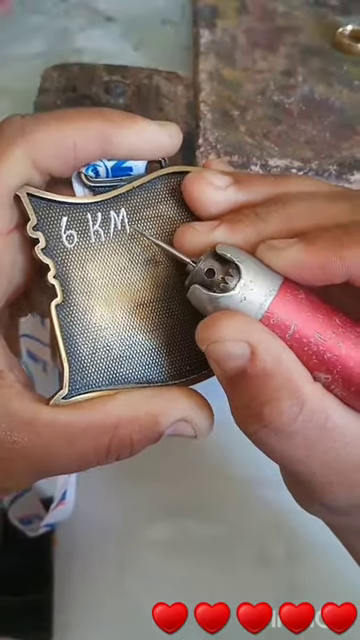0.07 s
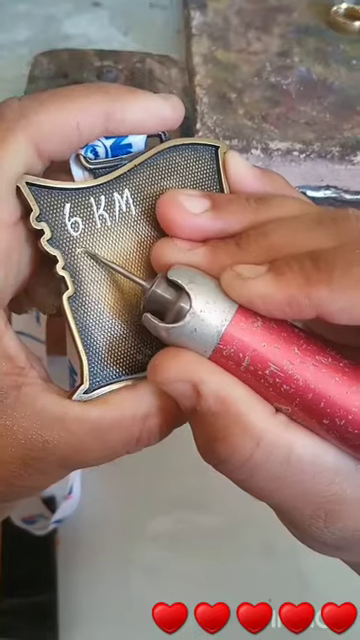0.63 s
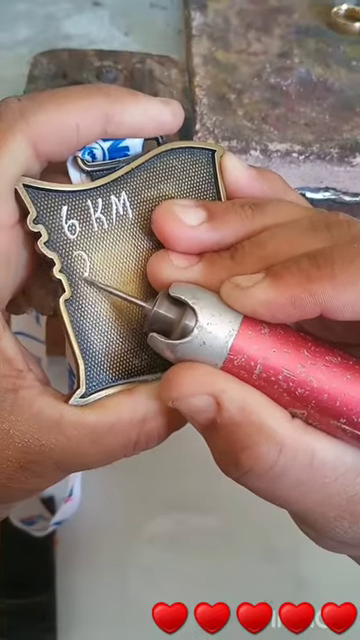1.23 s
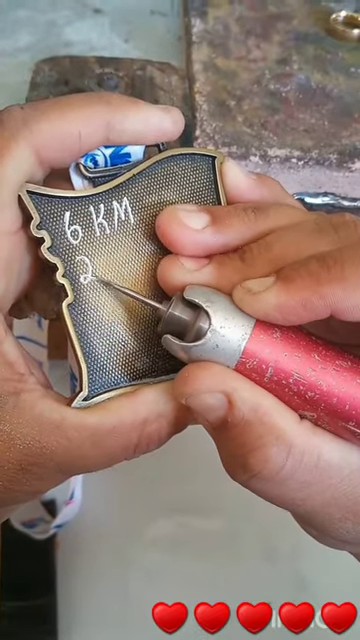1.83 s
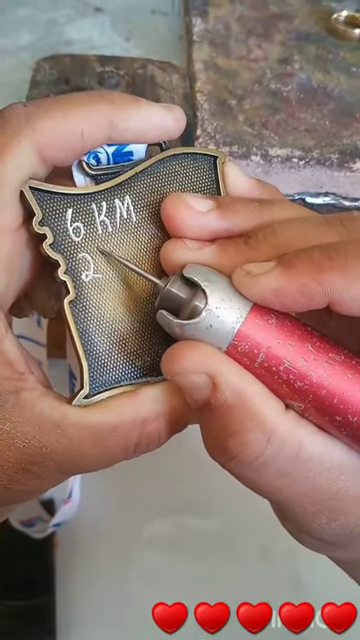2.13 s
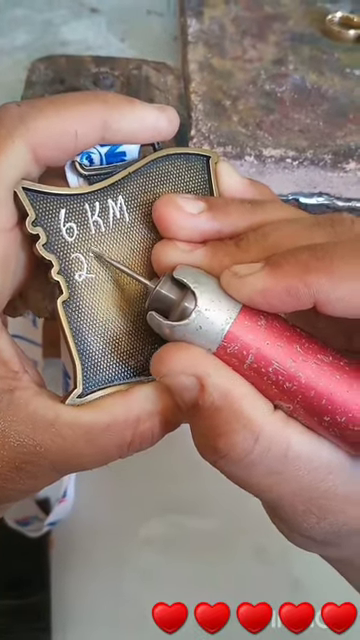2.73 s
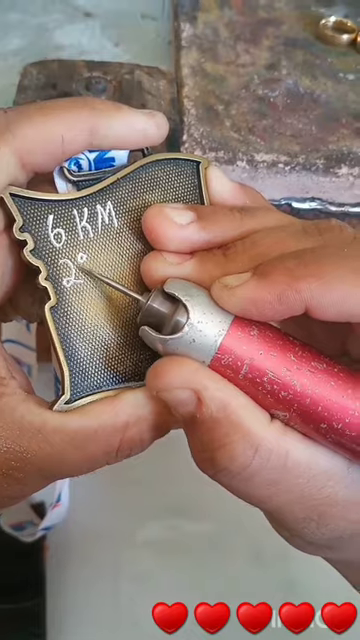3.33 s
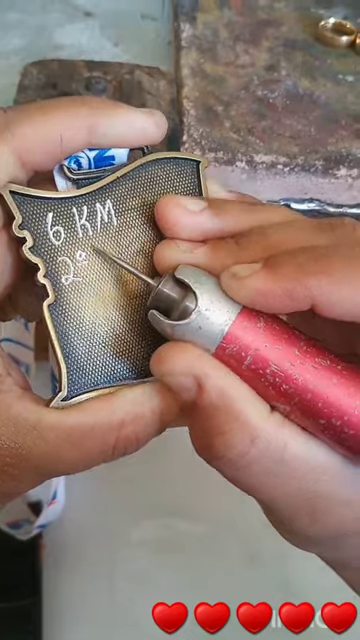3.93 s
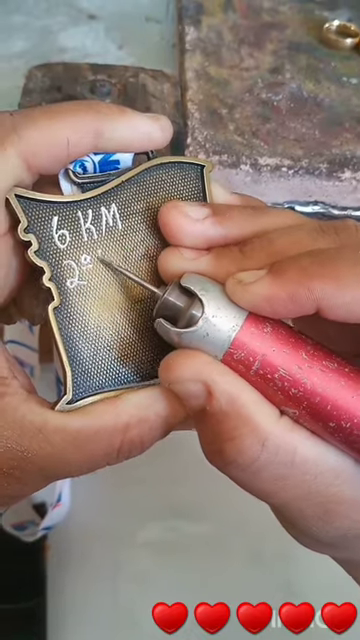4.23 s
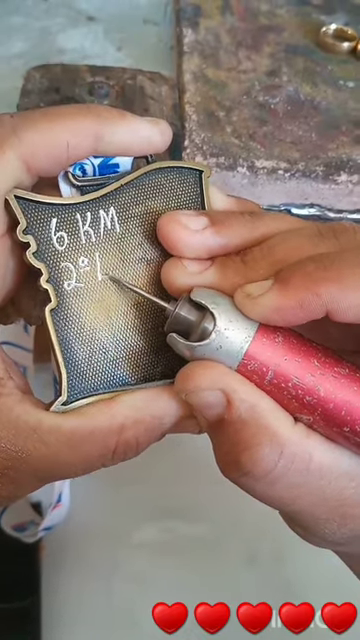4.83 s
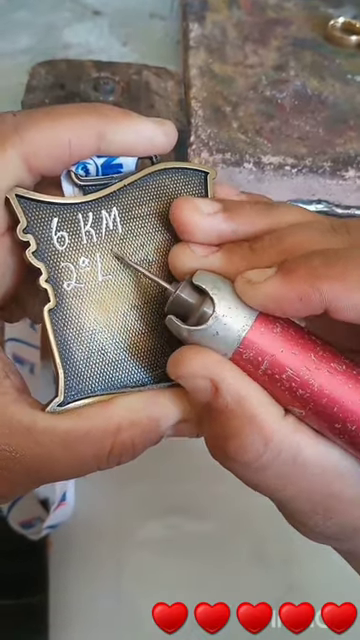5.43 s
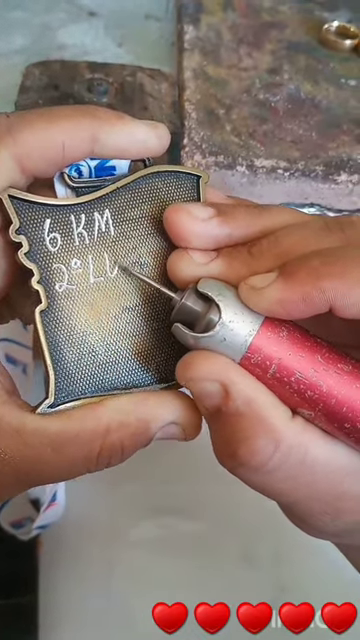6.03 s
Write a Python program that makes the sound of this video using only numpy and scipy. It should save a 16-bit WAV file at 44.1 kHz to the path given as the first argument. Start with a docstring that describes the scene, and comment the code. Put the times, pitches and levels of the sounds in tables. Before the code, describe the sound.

A rotary engraving pen coasts to a stop with a few small knocks, over one faint call like a distant animal. Fingers rub softly, then the pen abruptly runs at full speed. It grinds on a metal medal in about seven strokes, buzzing harshly with high squeals as the motor sags a little. Between strokes the shaft speeds up and rattles. The microphone is close, in a quiet workshop.

```python
"""A rotary engraving pen writes on a hand-held metal medal, close to the microphone in a quiet workshop. It
coasts to a stop with a few knocks and the fingers shift their grip; then the scene changes to the pen already
at full speed. In each stroke the burr grinds, squeals and drags the motor down; between strokes the shaft
speeds up and rattles in its bearing. Early on there is one faint call, perhaps a far-off animal."""
import sys
import numpy as np
from scipy import signal
from scipy.fft import rfft, irfft
from scipy.io import wavfile
from scipy.ndimage import uniform_filter1d

SR = 44100
rng = np.random.default_rng(int(sys.argv[2]) if len(sys.argv) > 2 else 0)


def materialize(psi):
    """Save the field psi as 16-bit PCM at rate SR to the path in sys.argv[1].

    A 1-D psi becomes a single channel; in a 2-D psi each row is a channel.
    """
    bounded = np.clip(np.atleast_2d(psi).T, -1, 1)
    quanta = np.round(bounded * 32767).astype(np.int16)
    wavfile.write(sys.argv[1], SR, quanta)


N = 267687
T = np.arange(N) / SR

# Strokes on the metal: start t/s, end t/s, bearing-down t/s, place (0 rim, 1 middle), shaft drag f/Hz,
# then level/dB of motor hum, housing buzz, shaft rattle, rasp and grit
STROKES = [(.48, 1.243, .36, 0.096, 11.1, -56, -27.5, -42.5, -20.5, -29.5),
           (1.239, 1.61, 0.044, 0.052, 6.36, -57, -24.5, -38, -21.5, -30),
           (1.611, 2.03, .11, 0.046, 10.3, -45.5, -26, -40.5, -20, -28),
           (2.33, 2.971, .12, 0.25, 7.03, -52.5, -28, -41, -21, -33),
           (3.519, 3.782, 0.0397, 0.38, 7.4, -51.5, -28, -41, -20.5, -32),
           (4.199, 5.03, .17, 1, 11, -44.5, -27, -41.5, -20, -29.5),
           (5.489, 6.099, .12, 0.82, 9.3, -45.5, -27, -41.5, -20.5, -30)]
# Squeals of the tip in the strokes, and the housing's brief 2 kHz ring as the pen lifts:
# start t/s, end t/s, first f/Hz, last f/Hz, level/dB
SQUEALS_AND_RINGS = [(0.465, 0.527, 2660, 2690, -22.5), (0.567, 1.099, 7320, 7050, -18),
                     (.84, 1.474, 2800, 3060, -28), (0.846, 1.154, 4790, 4520, -31),
                     (1.065, 1.243, 7480, 8350, -22), (1.622, 2.03, 8100, 8140, -29),
                     (2.285, 2.987, 7220, 7160, -23.5), (2.46, 2.54, 7030, 7140, -17),
                     (2.466, 2.534, 4480, 4540, -22.5), (2.5, 2.721, 2830, 2720, -30.5),
                     (2.324, 2.98, 2960, 2840, -35), (2.789, 2.903, 4477, 4580, -25.5),
                     (3.549, 3.793, 7190, 7175, -20.5), (3.786, 3.879, 2000, 2024, -22),
                     (4.353, 4.439, 8100, 7900, -21), (4.56, 4.78, 7910, 7514, -19.5),
                     (4.62, 4.926, 7133, 7190, -25.5), (4.754, 5.043, 8740, 8700, -31.5),
                     (5.029, 5.194, 2083, 2100, -25.5), (5.51, 5.8, 4140, 4294, -29),
                     (5.78, 6.03, 4340, 4350, -23.5), (5.58, 5.973, 6670, 6780, -26.5),
                     (5.62, 6.102, 2380, 2350, -31)]
# The burr bites deeper for a moment: middle t/s, length t/s, extra grit level/dB
BITES = [(1.202, 0.11, 9.5), (1.998, .05, 1.5), (2.5, 0.062, 9.5), (2.86, 0.083, 0.5), (4.563, .11, 3),
         (4.703, 0.11, 1), (4.985, 0.074, -0.5), (5.835, .15, 1.5)]
# Resonances of pen and medal: f/Hz, half-width f/Hz, relative level/dB
HOUSING_MODES = [(1317, 106, -9.5), (1635, 85, -6), (1840, 46, -5.5), (1998, 98, -0.5), (2138, 103, 0),
                 (2282, 144, -2), (2706, 62, -2), (2915, 200, -1.5), (3340, 160, -14), (3638, 183, -8)]
LOOSE_SHAFT_MODES = [(384, 51, -12), (503, 120, -7), (715, 75, 0), (920, 173, -4), (1210, 200, -14)]
FREE_BURR_MODES = [(4090, 94, -4), (4690, 560, -4.5), (5050, 70, -4), (5280, 270, -5), (5860, 580, -5.5),
                   (6500, 110, -6), (7170, 430, -0.5), (7500, 84, 0.5), (7750, 270, -6)]
MEDAL_RIM_MODES = [(4070, 140, -11), (4640, 290, -9), (4780, 580, -11.5), (5360, 320, -6.5),
                   (5900, 340, -17.5), (6740, 380, -9), (7250, 270, -2.5), (7740, 194, -9),
                   (8040, 280, -19)]
MEDAL_MIDDLE_MODES = [(4320, 250, -4.5), (4940, 120, -10), (4720, 260, -4), (5400, 580, -3),
                      (5850, 480, -2), (6890, 560, -0.5), (7300, 140, -8), (7560, 350, -4), (7960, 75, 2.5),
                      (8460, 250, -6)]
TIP_MODES, TIP_DB = [(13000, 210, 0)], -47.5  # thin ring while the tip touches
# Broad noise spectra: f/Hz, relative level/dB
COAST_SPECTRUM = [(100, -21), (350, -14), (800, -8.5), (1100, -13), (1400, 0), (2800, -4), (3600, -20),
                  (7500, 6), (9000, -7), (11000, -13), (15000, -24)]
ROOM_SPECTRUM = [(60, -16), (150, -8.5), (500, -6.5), (1200, -10), (2800, -18), (4500, -10.5),
                 (7500, -14), (10500, -18), (12500, -33)]
RUB_SPECTRUM = [(150, -12), (450, 4), (1100, -6), (2000, -22), (8000, -40)]
GRIT_SPECTRUM = [(3000, -21), (7500, -13), (8600, -1.5), (9600, -1), (10300, 1.5), (11300, -2),
                 (12000, -5.5), (12800, -10), (13200, -10), (13800, -13), (14800, -11.5), (15400, -5)]

RUN_S = .4525  # the scene changes to the pen already running at full speed
# Layer levels with the pen held in the air
FREE_HUM_DB, FREE_BUZZ_DB, FREE_RATTLE_DB, FREE_RASP_DB, FREE_GRIT_DB = -63.5, -26.5, -32.5, -22.5, -32
LIGHT_RATTLE_DB, LIGHT_GRIT_DB = -1, -4  # burr just resting on the metal, against a full stroke
BITE_RASP, BITE_BUZZ = .3, .51  # shares of a bite that reach the rasp and the housing


def amp(db):
    return 10 ** (np.asarray(db) / 20)


def unit(x):
    return x / np.sqrt(np.mean(x ** 2) + 1e-20)


def drift(hz):
    """A random wander of unit RMS that changes course hz times a second."""
    return unit(np.interp(T * hz, np.arange(N // 8), rng.standard_normal(N // 8)))


def causal(x, gain, size=4096):
    """Filters x with a gain curve so that each click rings afterwards, never before; unit RMS."""
    log_gain = np.log(np.maximum(gain / gain.max(), 1e-5))
    cepstrum = irfft(log_gain)[:size // 2]
    cepstrum[0] = 0
    response = irfft(np.exp(rfft(2 * cepstrum, size)))
    return unit(signal.oaconvolve(x, response)[:N])


def colour(x, spectrum, size=4096):
    """Gives x a broad spectrum."""
    hz, db = np.transpose(spectrum)
    log_f = np.log(np.fft.rfftfreq(size, 1 / SR) + 1)
    return causal(x, amp(np.interp(log_f, np.log(hz), db)))


def ring(x, modes, size=4096):
    """Passes x through steep-sided resonances and rolls off the bass."""
    f = np.fft.rfftfreq(size, 1 / SR)
    power = sum(amp(db) ** 2 / (1 + ((f - hz) / width) ** 2) ** 2 for hz, width, db in modes)
    return causal(x, np.sqrt(power) * f ** 2 / (f ** 2 + 260 ** 2))


def steady(x, size):
    """Holds the loudness of x even over spans of size samples, leaving its faster grain."""
    power = uniform_filter1d(uniform_filter1d(x ** 2, size), size)
    return unit(x / np.sqrt(abs(power) + 1e-3))


def coasting(start_hz=84, stop_s=.198, knock_s=.0013, rebound_db=-13):
    """The slowing shaft whirrs, knocks and rebounds once a turn, ever more rarely."""
    speed = np.clip(1 - T / stop_s, 0, 1)
    turns = np.cumsum(start_hz * speed) / SR - .37
    knocks = np.diff(np.floor(turns), prepend=-1)
    rebounds = amp(rebound_db) * np.diff(np.floor(turns - .5), prepend=-1)
    blows = signal.lfilter([1], [1, -np.exp(-1 / (knock_s * SR))], knocks + rebounds)
    whirr = amp(-32)
    drive = (amp(-12.5) * blows + whirr) * speed ** .65 * rng.standard_normal(N)
    body = amp(-8) * ring(drive, HOUSING_MODES) + amp(-5) * ring(drive, FREE_BURR_MODES)
    body += amp(-6) * colour(drive, COAST_SPECTRUM)
    return np.std(drive) * body


def room_tone():
    """The workshop behind the pen: a faint hiss and a wavering low hum."""
    hiss = colour(rng.standard_normal(N), ROOM_SPECTRUM)
    hum_db = np.interp(T, [.12, .16, RUN_S, RUN_S + .05], [-61, -54, -56, -72]) + 2 * drift(20)
    return amp(-57) * hiss + amp(hum_db) * np.sin(2 * np.pi * 238 * T)


def faint_call():
    """A faint, short call near 800 Hz rises and falls, perhaps a far-off animal."""
    arch = np.exp(-((T - .143) / .027) ** 2)
    call_hz = 760 + 110 * arch + 20 * drift(122)
    return amp(-40.5) * arch * np.sin(2 * np.pi * np.cumsum(call_hz) / SR)


def grip_rub():
    """The fingers shift their grip with a soft rub."""
    swell = np.exp(-((T - .318) / .018) ** 2)
    return amp(-52) * swell * colour(rng.standard_normal(N), RUB_SPECTRUM)


def shaft_turns(drag_hz, free_hz=185.27, inertia_s=.17):
    """Turns made so far: the speed sags under drag and recovers with the rotor's inertia."""
    keep = np.exp(-1 / (inertia_s * SR))
    speed_hz = free_hz - signal.lfilter([1 - keep], [1, -keep], drag_hz)
    return np.cumsum(speed_hz * (1 + .003 * drift(70))) / SR


def motor_hum(turns, down, load_db):
    """The motor hums on the low multiples of its speed, most strongly on the second."""
    once = amp(-15 + 5.2 * drift(22.18)) * np.sin(2 * np.pi * turns)
    twice = amp(-3 + 2.6 * drift(16)) * np.sin(4 * np.pi * turns)
    fourfold = amp(-44 + 2 * drift(30)) * np.sin(8 * np.pi * turns)
    return amp(load_db + 1.8 * drift(50)) * (once + twice) + (1 - .5 * down) * fourfold


def contacts(turns, rough, bunch, wear_hz, scatter_db, spots):
    """High spots strike once a turn, hardest on the shaft's heavy side, with scraping noise between."""
    strikes = np.zeros(N)
    whole_turns = np.arange(np.ceil(turns[-1]))
    near = np.arange(-6, 8)  # taps that place a click between samples
    for angle in (np.arange(spots) + rng.random(spots)) / spots:
        at = np.interp(whole_turns + angle, turns, np.arange(N))
        at = at[(at > len(near)) & (at < N - len(near))]
        force = drift(wear_hz)[at.astype(int)]  # each spot bites and lets go as the hand moves
        taps = at.astype(int)[:, None] + near
        np.add.at(strikes, taps, force[:, None] * np.sinc(taps - at[:, None]))
    drive = np.sqrt(1 - rough) * unit(strikes) + np.sqrt(rough) * rng.standard_normal(N)
    heavy_side = np.exp(bunch * np.cos(2 * np.pi * turns))
    per_turn = np.interp(turns, np.arange(N // 64), rng.standard_normal(N // 64))
    return unit(drive * heavy_side * amp(scatter_db * per_turn))


def grip_flutter(x, db, size=256):
    """As the grip and the contact shift, patches of the spectrum swell and fade for some 20 ms each."""
    frames = dict(nperseg=size, noverlap=3 * size // 4)
    spectra = signal.stft(x, **frames)[2]
    bands = uniform_filter1d(rng.standard_normal(spectra.shape), size=5, axis=0)
    patches = unit(uniform_filter1d(bands, size=14, axis=1))
    return signal.istft(spectra * unit(amp(db * patches)), **frames)[1][:N]


def finger_bounce(turns):
    """Gain of the pen bouncing in the fingers at about a quarter of the shaft speed."""
    sway = np.sin(2 * np.pi * .24 * turns + .6 * drift(5))
    return amp(.9 * sway + .3 * drift(70))


def squeals_and_rings(turns, slip_cycles=.091, scatter_db=2.3):
    """The tip squeals in the strokes, the housing rings as the pen lifts; tones restart every turn."""
    out = np.zeros(N)
    turn = turns.astype(int)
    since_turn = T - np.interp(turn, turns, T)
    for start, end, first_hz, last_hz, db in SQUEALS_AND_RINGS:
        progress = np.clip((T - start) / (end - start), 0, 1)
        swell = np.sqrt(np.clip(np.sin(np.pi * progress), 0, 1))
        hz = np.interp(T, [start, end], [first_hz, last_hz])
        slip, strength = rng.standard_normal((2, N // 64))[:, turn]
        burst = abs(np.sin(np.pi * turns)) ** .42 * amp(scatter_db * strength)
        tone = np.sin(2 * np.pi * (hz * since_turn + slip_cycles * slip))
        out += amp(db) * swell * unit(burst * tone)
    return out


def touch(ramp_s=.006):
    """For each stroke, whether the burr is on the medal and how hard the hand bears down (both 0-1)."""
    start, end, bear_s = np.transpose(STROKES)[:3, :, None]
    on = np.clip(np.minimum(T - start, end - T) / ramp_s + .5, 0, 1)
    on = on / np.maximum(on.sum(0), 1)
    return on, on * np.clip((T - start) / bear_s, 0, 1)


def medal_ring(cutting, place):
    """The burr excites the medal, whose resonances change from rim (0) to middle (1)."""
    rim, middle = ring(cutting, MEDAL_RIM_MODES), ring(cutting, MEDAL_MIDDLE_MODES)
    return np.sqrt(1 - place) * rim + np.sqrt(place) * middle


def lift_off(down, swing_s=.014, dip_db=-4.5):
    """Gain of the lull after each lift, as the shaft swings across its play before it knocks again."""
    just_lifted = np.clip(np.interp(T - swing_s, T, down) - down, 0, 1)
    return amp(dip_db * just_lifted)


def engraver():
    """The running pen, close up: one shaft drives the housing, the loose bearing and the burr."""
    on, pressure = touch()
    places, drags, hums, buzzes, rattles, rasps, grits = np.transpose(STROKES)[3:]
    down = np.clip(on.sum(0), 0, 1)
    free, light = 1 - down, down - pressure.sum(0)
    pressed, lifted = np.sqrt(down), np.sqrt(free)  # equal-power crossfade
    turns = shaft_turns(drags @ pressure)
    # bearing down feeds the rasp and the grit and steadies the shaft; the hand is never quite still
    bite_db = sum(db * np.exp(-(2 * (T - s) / length) ** 2) for s, length, db in BITES)
    tremor = .6 * down * drift(24)
    buzz_db = buzzes @ on + FREE_BUZZ_DB * free + BITE_BUZZ * bite_db + .31 * down * drift(16)
    rattle_db = rattles @ on + FREE_RATTLE_DB * free + LIGHT_RATTLE_DB * light
    rattle_db += .55 * drift(18) - 2 * tremor
    rasp_db = rasps @ on + FREE_RASP_DB * free + BITE_RASP * bite_db + tremor
    grit_db = grits @ on + FREE_GRIT_DB * free + LIGHT_GRIT_DB * light + bite_db + 2 * tremor
    # pressed on the metal the shaft strikes evenly; lifted, it knocks about
    bearing = contacts(turns + .5, rough=.27, bunch=.34, wear_hz=11, scatter_db=.95, spots=32)
    cutting = contacts(turns + .5, rough=.46, bunch=.27, wear_hz=11, scatter_db=1.5, spots=44)
    idling = contacts(turns + .5, rough=.57, bunch=.25, wear_hz=20, scatter_db=1.3, spots=28)
    knocking = contacts(turns + .5, rough=.71, bunch=.22, wear_hz=29.59, scatter_db=1.5, spots=14)
    buzz = amp(buzz_db) * steady(ring(pressed * bearing + lifted * idling, HOUSING_MODES), size=1200)
    shaft_blows = pressed * cutting + (lifted + .5 * pressed) * knocking
    rattle = amp(rattle_db) * steady(ring(shaft_blows, LOOSE_SHAFT_MODES), size=1200)
    medal = medal_ring(cutting, place=np.clip(places @ on, 0, 1))
    rasp = amp(rasp_db) * steady(pressed * medal + lifted * ring(idling, FREE_BURR_MODES), size=900)
    dust = pressed * cutting + lifted * idling + .5 * rng.standard_normal(N)
    grit = amp(grit_db) * steady(colour(dust, GRIT_SPECTRUM), size=900)
    tip = amp(TIP_DB) * pressed * ring(dust, TIP_MODES)
    bounce = finger_bounce(turns)
    grinding = grip_flutter(buzz + rattle + rasp + grit + tip + squeals_and_rings(turns), db=1.35)
    hum = motor_hum(turns, down, load_db=hums @ on + FREE_HUM_DB * free)
    running = np.clip((T - RUN_S) / .00032, 0, 1)
    return running * (bounce * lift_off(down) * grinding + hum)


def scene():
    """Pen and fingers in front, the call and the room behind, in mono."""
    return (engraver() + coasting() + faint_call() + grip_rub() + room_tone())[None]


def record(dry, low_cut_hz=140, top_hz=15600):
    """The close microphone rounds the highest peaks and sheds the bass and the extreme treble."""
    rounded = .82 * np.tanh(dry / .79)
    thin = signal.sosfilt(signal.butter(4, low_cut_hz, "high", fs=SR, output="sos"), rounded)
    lowpass = signal.firwin(511, top_hz, window=("kaiser", 9), fs=SR)
    return signal.oaconvolve(thin, lowpass[None], "same")


dry = scene()
out = record(dry)
materialize(out)
```